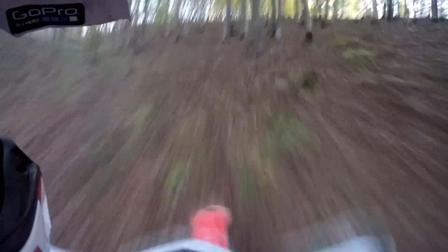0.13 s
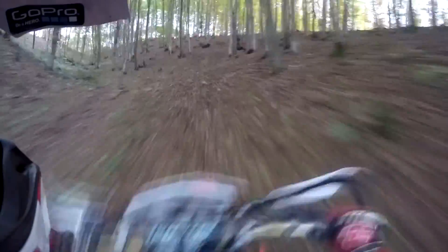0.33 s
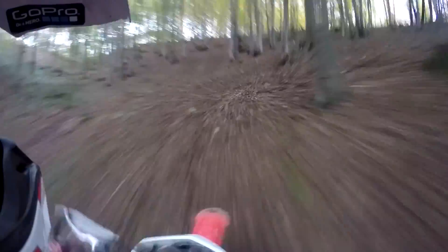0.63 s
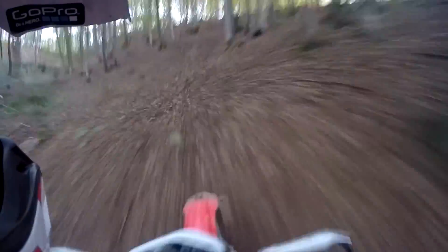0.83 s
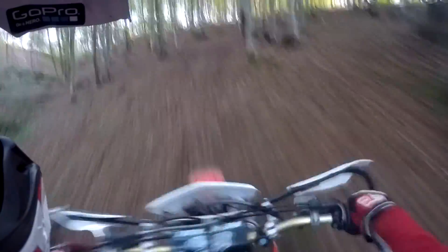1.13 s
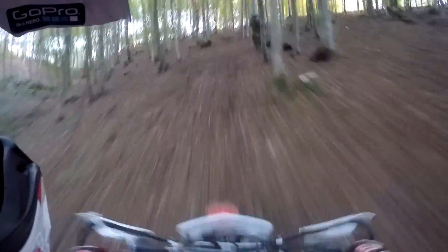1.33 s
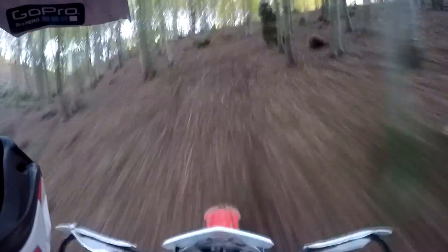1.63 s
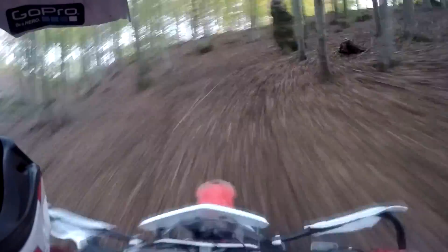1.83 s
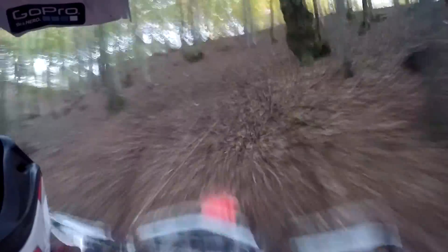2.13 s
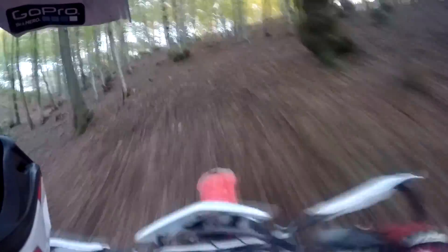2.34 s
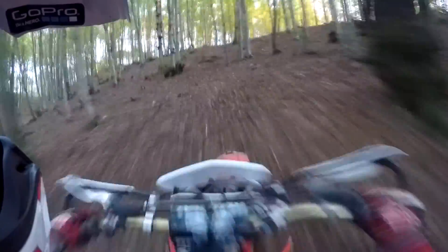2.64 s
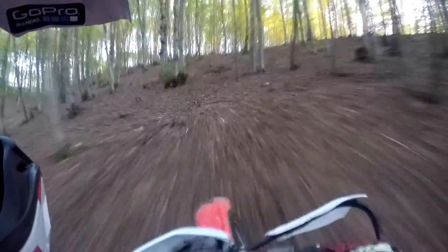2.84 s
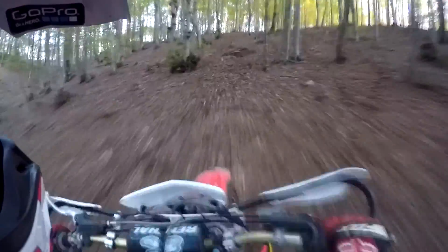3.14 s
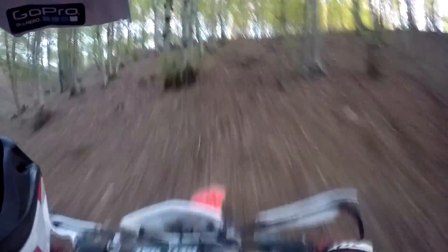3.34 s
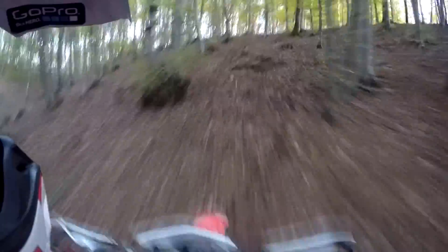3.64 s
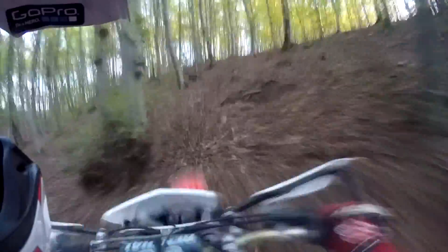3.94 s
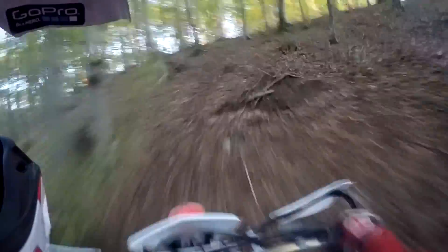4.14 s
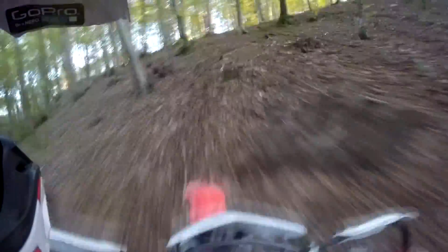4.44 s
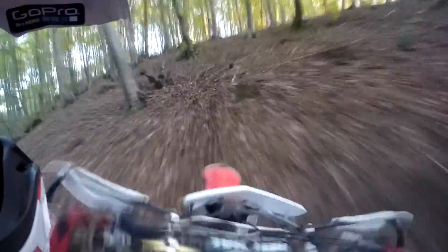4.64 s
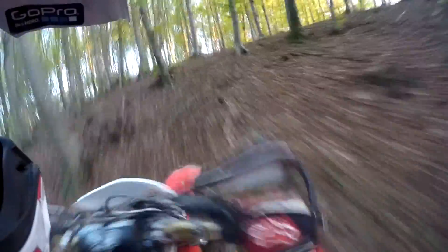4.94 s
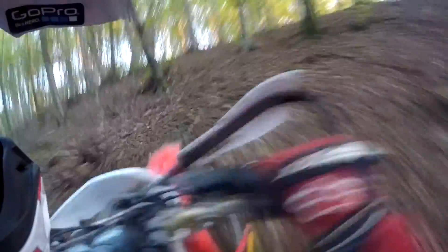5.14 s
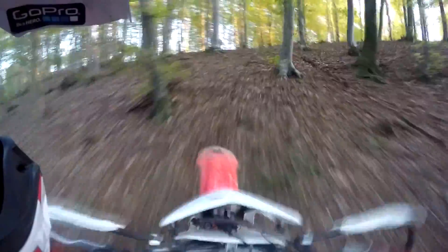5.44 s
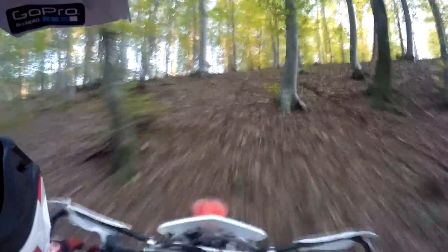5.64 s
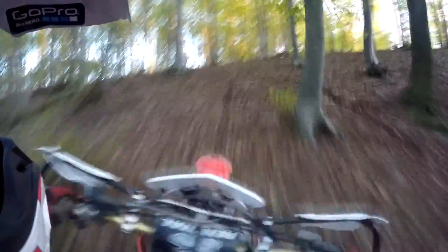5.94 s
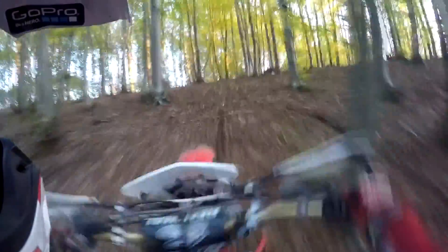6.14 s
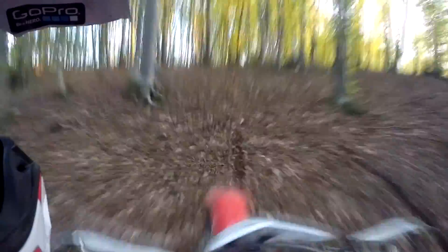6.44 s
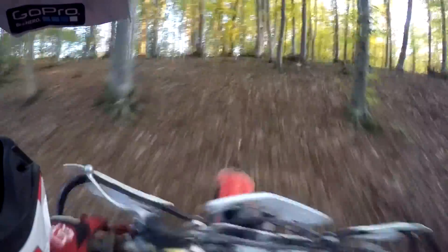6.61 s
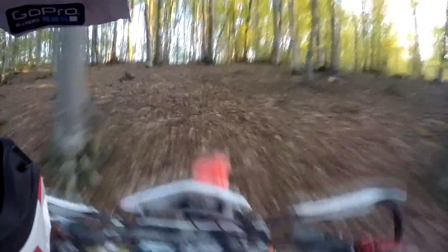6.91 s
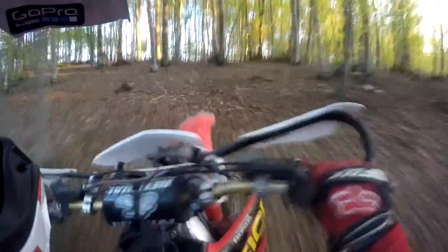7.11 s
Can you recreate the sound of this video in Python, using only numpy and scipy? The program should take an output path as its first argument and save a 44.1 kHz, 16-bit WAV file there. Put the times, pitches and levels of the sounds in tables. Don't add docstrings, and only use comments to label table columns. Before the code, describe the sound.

A two-stroke dirt bike heard from the rider's helmet, very close and dry. The ringing, raspy engine starts high, cuts briefly, then sinks to a labouring low note before climbing back into a long hard pull. Later come quick throttle chops and flares as the tyre slips. Low wind gusts thump the case early on, a few twigs tick, and one hard knock with a thud lands past the middle.

```python
import sys
import numpy as np
from scipy import signal
from scipy.fft import rfft, irfft
from scipy.io import wavfile
from scipy.ndimage import uniform_filter1d

SR = 44100
rng = np.random.default_rng(int(sys.argv[2]) if len(sys.argv) > 2 else 0)


def invert_db(level):
    return 10 ** (np.asarray(level, dtype=float) / 20)


def dump_mix(stems):
    frames = np.atleast_2d(stems).T
    limited = np.clip(frames, -1, 1)
    pcm = np.round(limited * 32767).astype(np.int16)
    wavfile.write(sys.argv[1], SR, pcm)


N = 320607
TIME = np.arange(N) / SR
HEAT_S = 0.59

# time in seconds, load on the engine in dB,
# body shading the silencer in dB, leaning over the exhaust chamber in dB.
RIDER = [(0, -0.8, -2, -3.5), (.25, -1.7, 7, -2), (.43, -1, -3, -4.5), (.9, 0.65, 2.5, -1),
         (1.38, 0.5, 3.3, 8), (1.76, 3, -18.5, -5), (2.0, 1.8, -8, 1.5), (2.55, 0.76, 4, -5.5),
         (2.8, .3, 4, 2), (3.3, 0.67, -3, 2.2), (3.7, 1.03, 4.5, 7), (4.42, 0, -9.5, -5),
         (4.65, -0.17, 5.5, -11), (5.05, 1, 4, 4.5), (5.6, -0.46, 2, -1), (6.0, 0, 0.3, -2),
         (6.7, -0.04, 5.5, 3.5), (7.27, 0.5, 5.5, 1.5)]


def exhaust(hz, turns, throttle, misfire, luck):
    # level with throttle shut in dB, level with it open in dB,
    # dB per 10 Hz above cruising speed when shut, the same when open, share of the load (dB per dB).
    note_law = (-25.5, -11, -0.8, -0.63, 0.1)
    thump_law = (-31.5, -26, -0.5, 0, 2.1)
    boom_law = (-25, -16.5, 0.12, 3.0, -1.8)
    overtone_law = (-22, -15.5, 1.84, 0.8, 1.15)
    untuned_law = (1, -11, 3.1, 1.6, 4.4)
    eager = (1.22, 0.2, 0.49, 0.77)
    _, shade_db, lean_db = columns(RIDER)
    shut = 1 - throttle

    change = throttle - lagged(throttle, 0.056)
    starve_db = -5 * np.clip(-change, 0, 1) * shut
    snap_db = 2.5 * np.clip(change, 0, 1) * throttle ** 2
    laws = (note_law, thump_law, boom_law, overtone_law)
    note_db, thump_db, boom_db, overtone_db = [
        level_db(law, hz, throttle ** power) + starve_db + snap_db for law, power in zip(laws, eager)]
    untuned_db = level_db(untuned_law, hz, throttle) + shade_db
    boom_db = boom_db + lean_db
    cold_db = 3.5 * (1 - lagged(throttle, HEAT_S))
    lug_db = 9.5 * misfire
    thump_db = thump_db + throttle * (cold_db + lug_db)

    cycle, angle = turns.astype(int), turns % 1
    note_order, overtone_order = tuning(hz, throttle)
    uneven = .12 + .3 * shut + .6 * misfire
    late = .1 + .035 * uneven * luck[cycle, 0]
    size = invert_db(7.0 * uneven * luck[cycle, 1])
    pulse, first, second = [
        size * np.exp(-((angle - late - k / note_order) / .018) ** 2) for k in range(3)]
    gas = rng.standard_normal(N) * size * (angle > late)
    gas *= np.exp(-angle / (.3 + 2.5 * throttle))
    gas *= 1.0 + .1 * shut + 1.2 * misfire
    drive = levelled(pulse - pulse.mean()) + gas
    echoes = throttle * (0.081 * first + 0.094 * second)
    echoed = levelled(pulse + echoes) + gas

    thump = band(drive, 50, 127)
    boom_hz = np.clip(2 * hz, 150, 215)
    boom = resonate(resonate(drive, boom_hz, 51), boom_hz, 47)
    note_hz, overtone_hz = hz * note_order, hz * overtone_order
    note = resonate(resonate(echoed, note_hz, 123), note_hz, 162)
    overtone = resonate(resonate(drive, overtone_hz, 76), overtone_hz, 57)
    overtone *= .03 + .97 * throttle ** 2
    overtone += invert_db(-25.5) * (1 - throttle ** 2) * resonate(drive, overtone_hz, 177)
    drift_db = 3.0 * np.array([wander(1, 3.5) for _ in range(3)])
    between = band(drive, 334, 466.0, order=3)
    overtone += throttle ** 2 * invert_db(-6.5 + drift_db[1]) * band(drive, 440, 488.5)
    overtone += throttle ** 2 * invert_db(-11.5 + drift_db[2]) * band(drive, 588, 640.3, order=3)

    parts = (thump, -boom, note, between, overtone)
    levels = (thump_db, boom_db, note_db, note_db + untuned_db, overtone_db)
    mixed = sum(invert_db(db) * levelled(part) for part, db in zip(parts, levels))
    silencer = signal.butter(4, 740, fs=SR, output="sos")
    leak_db = overtone_db - 30 + drift_db[0]
    return signal.sosfilt(silencer, mixed) + invert_db(leak_db) * levelled(band(drive, 800, 1350))


def rasp(hz, turns, throttle, luck):
    # time in seconds, strain in dB.
    strain = [(0, .6), (.24, 2.5), (.42, -3), (.85, 0.5), (1.5, -2.4), (1.86, 0.5), (2.35, -3), (2.63, 1),
              (3.3, 0.5), (3.68, 2), (4.2, 1.5), (4.47, -4.5), (4.68, -0.4), (5.0, 3.5), (5.45, -1.5),
              (6.5, -0.5), (6.7, 2.5), (7.27, 0.6)]
    # level with throttle shut in dB, level with it open in dB,
    # dB per 10 Hz above cruising speed when shut, the same when open, share of the load (dB per dB).
    rasp_law = (-37, -30.5, 1.1, 0.4, 0.98)
    # frequency in Hz, level in dB per Hz.
    rasp_colour = [(470, -32), (800, -0.5), (872, -8), (986, -7.5), (1130, -6.5), (1560, -7), (1970, -9.5),
                   (2880, -4.5), (3550, -12.5), (4320, -14), (5400, -14), (7620, -26), (9510, -30),
                   (13600, -40.5), (15200, -38)]
    strain_db = columns(strain)[0]

    share_shut = 0.027
    share_open = 0.27 + 0.0149 * strain_db
    share = np.clip(share_shut + (share_open - share_shut) * throttle, 0, 1)
    cycle = (turns - .37).astype(int)
    since = (turns - .37) % 1 / hz
    size = invert_db(1.8 * luck[cycle, 2])
    burst = np.exp(-since / .0022) * (1 - np.exp(-since / .00015)) * size
    slap = levelled(np.diff(cycle, prepend=cycle[0]) * size)
    hiss = rng.standard_normal(N)
    cracks = levelled(burst) * rng.standard_normal(N) + .8 * slap
    cracks += 0.92 * band(cracks * invert_db(2.1 * luck[cycle, 3]), 9240, 21000)
    chirp_hz = 1500 + 1600 * np.clip(since / 0.00054, 0, 1)
    cracks += 0.97 * resonate(cracks, chirp_hz, 1600)
    both = np.sqrt(1 - share) * hiss + np.sqrt(share) * cracks
    both += 1.04 * resonate(both, 4190, 300) + 0.14 * resonate(both, 2280, 330)
    rasp_db = strain_db + level_db(rasp_law, hz, lagged(throttle, 0.011))
    return invert_db(rasp_db) * levelled(coloured(both, rasp_colour), size=5000)


def twist():
    # opens at in seconds, roll-on time in seconds,
    # shuts at in seconds, opening 0-1, misfire 0-1.
    twists = [(-.1, .05, .55, 1, 0), (.69, .03, .9, .55, .2), (.72, .1, .98, 1, 0),
              (1.52, .2, 1.85, .6, .7), (1.8, .03, 3.355, 1, 0), (3.535, .05, 3.715, 1, 0),
              (3.9, .02, 4.025, 1, .5), (4.16, .02, 4.73, 1, 0), (4.79, .03, 4.86, .2, .8),
              (4.855, .02, 5, .5, .2), (4.86, .07, 5.265, 1, 0), (5.398, .02, 6.085, 1, 0),
              (6.195, .02, 6.45, .42, .2), (6.29, .12, 7.19, 1, 0)]
    s, roll, shut, opening, misfire = np.transpose(twists)[:, :, None]
    held = np.clip(np.minimum((TIME - s) / roll, (shut - TIME) / 0.061 + .5), 0, 1)
    return np.clip((held * opening).max(0), 0, 1), np.clip((held * misfire).max(0), 0, 1)


def speed():
    # time in seconds, firings per second in Hz.
    grip = [(0.0, 95.6), (0.44, 95.5), (0.62, 75.6), (1.06, 58.0), (1.39, 43.0), (1.61, 43.2), (2.05, 87.0),
            (2.47, 89.1), (2.65, 80.1), (3.23, 84.0), (3.62, 65.8), (3.87, 48.1), (4.16, 65.9),
            (4.57, 89.5), (4.84, 72.5), (5.41, 67.9), (6.17, 79.3), (7.27, 70.1)]
    # peak time in seconds,
    # extra firings per second in Hz, rise in seconds, fall in seconds.
    flares = [(0.25, 9.2, 0.294, 0.085), (0.546, 22.4, 0.1, 0.103), (0.936, 17.9, 0.23, 0.156),
              (1.734, 4.3, 0.098, 0.343), (2.303, 7.5, 0.084, 0.105), (2.417, 2.7, 0.092, 0.156),
              (2.81, 13.1, 0.136, 0.157), (3.009, 9.3, 0.091, 0.114), (3.378, 19.1, 0.198, 0.127),
              (3.492, 9.6, 0.098, 0.083), (3.708, 12.6, 0.126, 0.12), (4.025, 23.8, 0.12, 0.166),
              (4.306, 20.3, 0.128, 0.221), (4.493, 5.9, 0.15, 0.09), (4.702, 14.6, 0.09, 0.112),
              (5.009, 24.6, 0.154, 0.193), (5.209, 17.1, 0.147, 0.241), (5.562, 37.0, 0.192, 0.164),
              (5.723, 21.6, 0.103, 0.142), (5.878, 12.8, 0.182, 0.171), (6.043, 10.3, 0.165, 0.185),
              (6.393, 14.2, 0.136, 0.108), (6.687, 14.4, 0.285, 0.173), (6.86, 17.5, 0.194, 0.185),
              (7.154, 9.5, 0.149, 0.224)]
    hz = columns(grip)[0]
    for s, extra, rise, fall in flares:
        away = np.clip(np.maximum((s - TIME) / rise, (TIME - s) / fall), 0, 1)
        hz = hz + extra * np.cos(np.pi * away / 2) ** 2
    return hz


def crank():
    hz = speed()
    return hz, np.cumsum(hz * (1 + .007 * wander(6, 14))) / SR


def tuning(hz, throttle):
    pipe_hz, upper_hz = 264.7, 534.4
    lock_hz = 77.96 + 17.8 * (1 - lagged(throttle, HEAT_S))
    free = np.clip((lock_hz - hz) / 6.5, 0, 1)
    note_order = 3 + free * (pipe_hz / hz - 3)
    overtone_order = 6 + free * (np.maximum(upper_hz / hz, 7.62) - 6)
    return note_order, overtone_order


def level_db(law, hz, throttle):
    shut_db, open_db, shut_slope, open_slope, share = law
    faster = (hz - 88) / 10
    shut = shut_db + shut_slope * faster
    wide = open_db + open_slope * faster
    return shut + (wide - shut) * throttle + share * columns(RIDER)[0]


def strikes():
    # time in seconds, peak level in dB, knock level against the peak in dB.
    hits = [
        (1.314, -52.5, 8.5),
        (1.581, -67, 0),
        (3.624, -44.5, -8),
        (4.3592, -43, 12),
        (4.3677, -52, -6),
    ]
    # time in seconds, level in dB, pitch in Hz,
    # time to fade by 60 dB in seconds.
    thud = (4.352, -10, 60, .14)
    out, t = np.zeros(N + SR), np.arange(6000) / SR
    for (s, db, knock_db), noise in zip(hits, rng.standard_normal((len(hits), 6000))):
        snap = noise * invert_db(-60 * t / 0.024) * (1 + 1.76 * (t < .005))
        tick = band(snap, 6000, 16000, order=1)
        knock = invert_db(knock_db + 9.0) * band(snap, 1500, 4600, order=1)
        out[round(s * SR):][:6000] += invert_db(db) * (tick + knock)
    s, db, hz, t60 = thud
    bent = t + .019 * (1 - np.exp(-t / .0086))
    fade = invert_db(db - 60 * t / t60) * (1 - np.exp(-t / 0.0029))
    out[round(s * SR):][:6000] += fade * np.sin(2 * np.pi * hz * bent)
    return out[:N]


def wind():
    # start in seconds, length in seconds, level in dB.
    gusts = [(-.1, 0.23, -31), (0.233, .2, -34), (0.497, .4, -23.5), (.9, 0.15, -30), (1.08, 0.66, -21),
             (1.803, .12, -37), (2.2, .15, -35), (2.37, 0.12, -29), (2.55, 0.39, -40), (2.97, 0.13, -37),
             (3.35, .2, -43), (3.6, .4, -26), (4.02, 0.29, -39), (4.315, 0.1, -22.5), (4.6, .4, -38),
             (5.25, 0.3, -43), (5.9, .5, -46)]
    rumble = band(rng.standard_normal(N), 32, 60, order=3) * invert_db(2.2 * wander(2.5, 12))
    s, length, db = np.transpose(gusts)[:, :, None]
    swell = invert_db(db) * np.sin(np.pi * np.clip((TIME - s) / length, 0, 1))
    calm = invert_db(-51.5)
    return (calm + swell.sum(0)) * levelled(rumble, size=4000)


def columns(rows):
    s, *values = np.transpose(rows)
    return [np.interp(TIME, s, v) for v in values]


def levelled(x, size=2600):
    power = uniform_filter1d(uniform_filter1d(x ** 2, size), size)
    return x / np.sqrt(abs(power) + 1e-12)


def lagged(x, seconds):
    r = np.exp(-1 / (seconds * SR))
    return signal.lfilter([1 - r], [1, -r], x - x[0]) + x[0]


def wander(low_hz, high_hz):
    return levelled(band(rng.standard_normal(N), low_hz, high_hz, order=1), size=N // 2)


def resonate(x, hz, width_hz):
    turn = np.exp(2j * np.pi * np.cumsum(hz * np.ones(N)) / SR)
    r = np.exp(-np.pi * width_hz / SR)
    return 2 * (turn * signal.lfilter([1 - r], [1, -r], x / turn)).real


def band(x, low_hz, high_hz, order=2):
    return signal.sosfilt(signal.butter(order, [low_hz, high_hz], "band", fs=SR, output="sos"), x)


def coloured(x, points):
    hz = np.fft.rfftfreq(N, 1 / SR)
    f, db = np.transpose(points)
    return irfft(rfft(x) * invert_db(np.interp(np.log(hz + 1), np.log(f), db)), N)


def scene():
    hz, turns = crank()
    throttle, misfire = twist()
    luck = np.clip(rng.standard_normal((900, 4)), -2.5, 2.5)
    engine = exhaust(hz, turns, throttle, misfire, luck) + rasp(hz, turns, throttle, luck)
    return (engine + strikes() + wind())[None]


def band_limit(x):
    return signal.sosfilt(signal.butter(12, 15340, fs=SR, output="sos"), x)


def record(dry):
    ceiling = 1.05
    rounded = ceiling * np.tanh(dry / ceiling)
    mix = signal.sosfilt(signal.butter(2, 28, "high", fs=SR, output="sos"), rounded)
    return band_limit(mix)


dry = scene()
out = record(dry)
dump_mix(out)
```